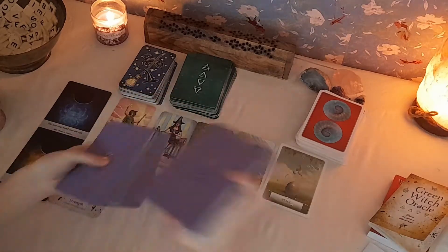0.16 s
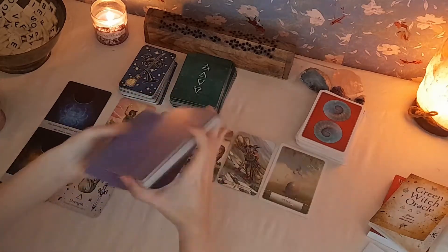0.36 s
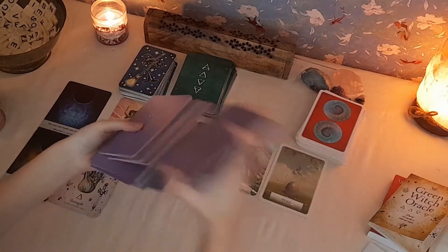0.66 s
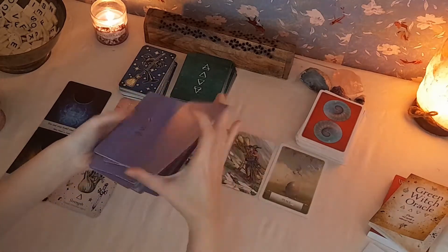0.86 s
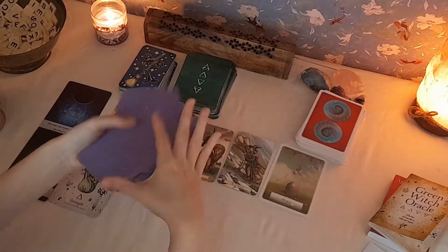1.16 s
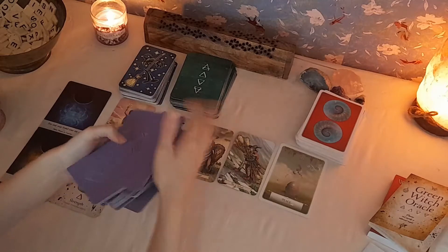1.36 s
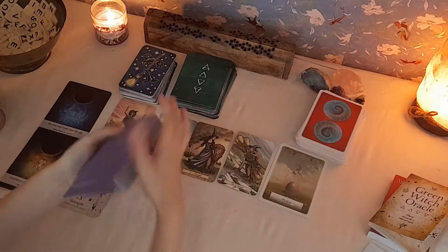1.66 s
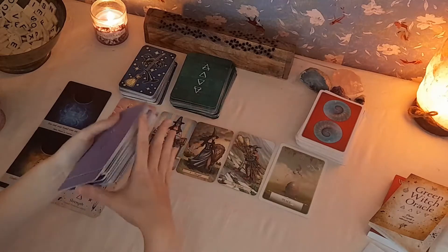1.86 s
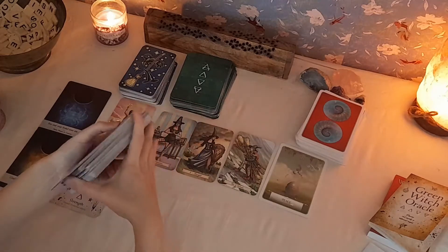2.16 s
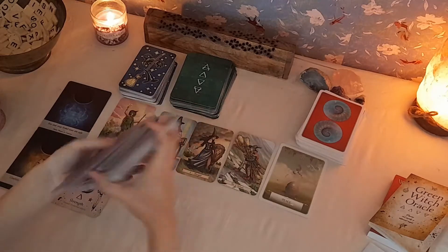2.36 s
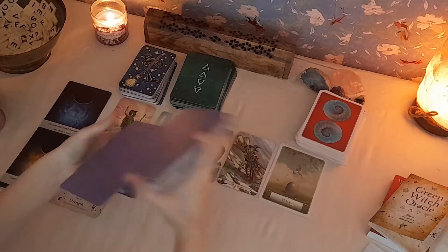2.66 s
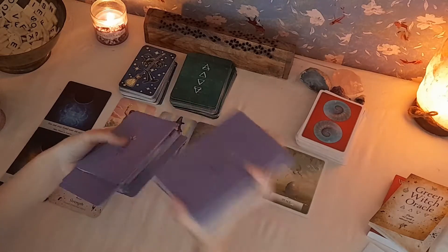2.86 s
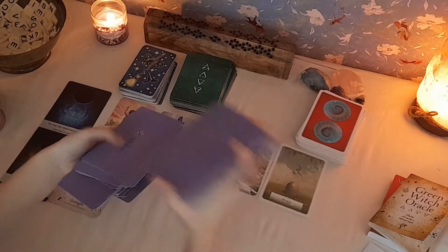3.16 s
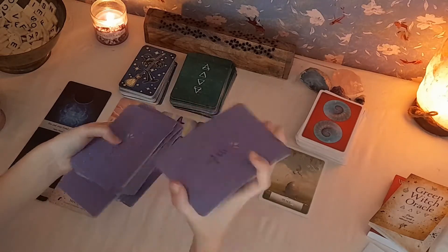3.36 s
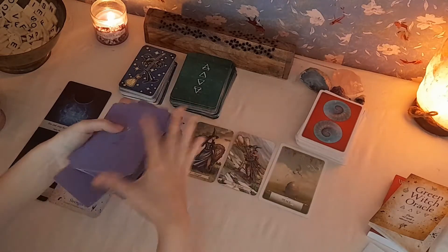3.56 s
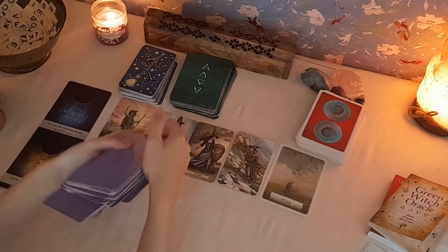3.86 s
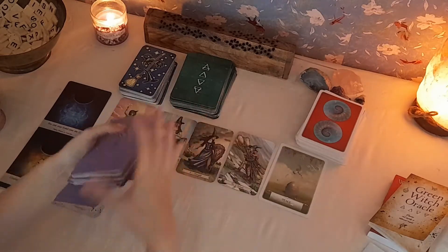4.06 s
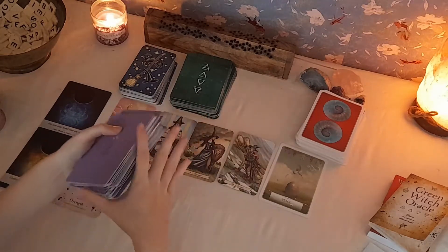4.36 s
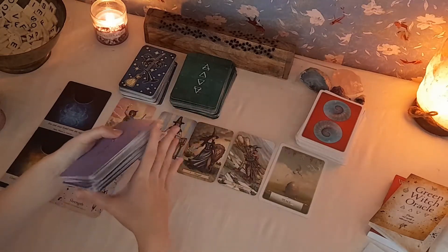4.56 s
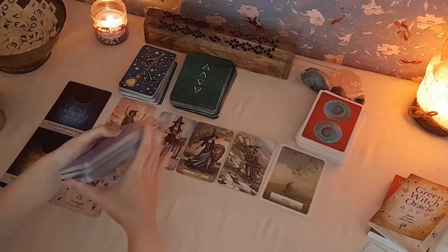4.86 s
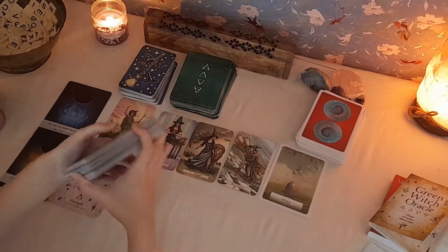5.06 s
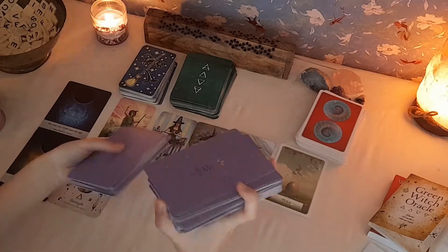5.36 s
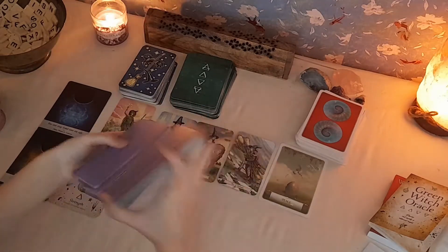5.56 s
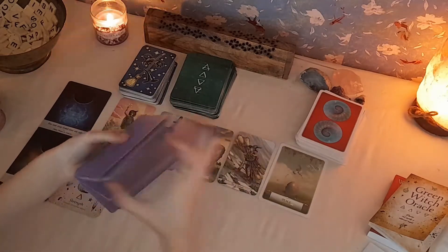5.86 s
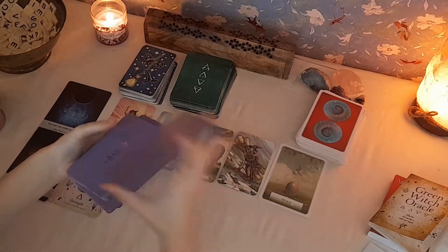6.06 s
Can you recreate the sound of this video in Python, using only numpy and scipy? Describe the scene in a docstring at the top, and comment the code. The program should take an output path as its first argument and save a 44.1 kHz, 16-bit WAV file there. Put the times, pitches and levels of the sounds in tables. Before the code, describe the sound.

A deck of large cards is shuffled by hand in runs of crisp slaps and slides, with soft rubs and ticks between.

```python
"""Overhand shuffle of large cards

A deck is shuffled above a cloth-covered table in a small room. Sliding friction gives each packet a
grainy hiss; its impact gives a slap, with a thump from the trapped air. Between runs the deck is
squared with soft rubs and ticks. The room rings briefly, over a mains hum and a faint rumble."""
import sys
import numpy as np
from scipy import signal
from scipy.fft import rfft, irfft, next_fast_len
from scipy.io import wavfile
from scipy.ndimage import uniform_filter1d

SR = 44100
rng = np.random.default_rng(int(sys.argv[2]) if len(sys.argv) > 2 else 0)


def unload_audio(sound):
    """Save the sound as a 16-bit wav file, at the path given as the first command line argument."""
    columns = np.transpose(np.atleast_2d(sound))
    # keep every value between -1 and 1, then stretch to whole-number steps
    steps = np.round(np.clip(columns, -1, 1) * 32767)
    wavfile.write(sys.argv[1], SR, steps.astype(np.int16))


N = 273861
T = np.arange(N) / SR

# noise spectrum of the quiet room: f/Hz, relative level/dB
AMBIENT_SPECTRUM = [(20, -1), (40, -2), (80, -27), (150, -15.5), (260, -13.5), (500, -21), (1000, -27),
                    (3000, -34.5), (8000, -33.5), (13000, -36), (16000, -37.5)]
# resonances of the table and the room's near corner: f/Hz, bandwidth/Hz, gain/dB
MODES = [(218, 43, -6.5), (351.8, 7.3, 7), (533, 71, 1), (732, 50, 1.5), (1103, 40, -0.5), (1295, 22, 3.5),
         (1600, 64, -6.5), (2340, 110, 0)]
# reverberation time of the room: f/Hz, T60/s
REVERB_TIMES = [(150, .28), (400, 0.4), (1100, 0.39), (2800, 0.29), (4800, 0.31), (8000, 0.23),
                (14000, 0.2)]
# frequency response of the reflections: f/Hz, gain/dB
WALL_RESPONSE = [(80, -6), (200, -6), (350, -4.5), (600, -4.5), (850, -6), (1200, -4), (1600, -3),
                 (2000, -2.5), (3000, -5), (5000, -6), (8000, -4), (15000, -6.5)]
# spectrum of card faces sliding: f/Hz, relative level/dB
HISS_SPECTRUM = [(400, -32), (900, -23.5), (2000, -12.5), (3500, -8), (5500, -6.5), (8500, -0.5),
                 (11000, -4), (13000, -11), (16000, -16)]
# spectrum of faces rasping under pressure: f/Hz, relative level/dB
RASP_SPECTRUM = [(80, -8), (160, 4.5), (500, -2), (1100, -4.5), (1700, -1.5), (2600, -4), (4000, -6),
                 (6000, -12.5), (9000, -26.5)]
# spectrum of edges scraping past each other: f/Hz, relative level/dB
SCRATCH_SPECTRUM = [(300, -16.5), (800, -5.5), (1600, -6), (2800, -2.5), (4500, -1), (7000, -6),
                    (12000, -27.5)]
# spectrum of one edge clicking into line: f/Hz, relative level/dB
TICK_SPECTRUM = [(300, -22), (1000, -7.5), (2400, 2), (4500, 1), (8500, 1.5), (13000, -8), (16000, -17)]
# finger strokes squaring the deck or drawing a packet: t/s, duration/s, hiss/dB, scratch/dB re hiss
FINGER_STROKES = [(-.01, 0.08, -70.5, -1), (.062, 0.12, -65, -12), (1.373, 0.048, -58.5, -8.5),
                  (1.431, 0.079, -67.5, 0), (1.598, 0.051, -76.5, 2), (1.85, 0.055, -82.5, 0.5),
                  (2.16, 0.33, -85.5, 4), (2.306, 0.13, -66, -11), (3.247, 0.053, -59.5, -12),
                  (3.752, 0.031, -62, -5.5), (3.79, .08, -69.5, -1), (3.91, 0.092, -76.5, -4.5),
                  (4.242, 0.062, -64.5, -14), (4.287, 0.058, -62, -22), (4.402, 0.064, -70, 2.5),
                  (4.934, .275, -76, -3), (5.2, .09, -65, -1.5)]
# single edges clicking into line: t/s, level/dB
EDGE_TICKS = [(1.86, -47.5), (1.988, -46), (2.375, -34), (3.923, -48), (3.999, -32.5), (4.235, -50),
              (4.422, -42), (5.04, -46.5), (5.214, -38.5)]
# packets sliding into the deck: t/s, duration/s, hiss/dB, rasp/dB re hiss
PACKET_SLIDES = [(0.151, .041, -51.5, -5), (0.409, 0.02, -53, 1), (0.438, 0.028, -47, 6.5),
                 (0.662, 0.031, -50.5, 0), (0.702, 0.032, -50.5, 3), (.909, 0.015, -46, 2),
                 (0.952, 0.046, -53, 8), (1.146, 0.069, -56.5, 0.5), (2.486, 0.01, -47.5, 1),
                 (2.766, 0.031, -48, -2), (3.012, 0.012, -55, 0), (3.029, 0.048, -48.5, 0.5),
                 (3.283, 0.057, -54.5, 3), (3.538, 0.07, -53.5, -4.5), (5.57, 0.022, -59.5, 9.5),
                 (5.585, 0.026, -49, 6.5), (5.618, 0.03, -50, -0.5), (5.874, 0.058, -47.5, -13),
                 (6.147, 0.05, -49, -2)]
# packets landing: t/s, slap/dB, slap f/Hz, snap/dB re slap, tick/dB re slap, clatter/dB re first contact
PACKET_LANDINGS = [(0.168, -15, 1300, -6.5, -2, -13), (0.44, -40.5, 1580, -14, 19.5, 16),
                   (0.466, -21, 1640, -2, 1, 4.5), (0.665, -22, 570, -11, -25, -33),
                   (0.742, -22.5, 1060, -5.5, -9.5, 2.5), (0.911, -21.5, 2030, -4.5, -9, 6),
                   (0.95, -16, 1900, -7, -7, 0), (0.98, -16, 1070, 1, -13, -7),
                   (1.146, -44, 1490, 13.5, 7, -4), (1.159, -26, 1720, 2.5, 2.5, -3.5),
                   (2.492, -22.5, 1370, -6, -3.5, -8), (2.745, -38, 2220, 4, 5, -7.5),
                   (2.768, -28, 1610, -7, -7, -14), (2.81, -17, 1420, -3.5, -5, -19),
                   (3.086, -4, 1305, -1, -13.5, -7.5), (3.356, -7, 1070, -6, -14, -11),
                   (3.523, -10.5, 1300, -3, -2, -3.5), (3.568, -28.5, 1220, 6, 5, 0),
                   (5.3, -30, 1870, 1.5, 6.5, -0.5), (5.651, -23, 1510, -1.5, -1, -17),
                   (5.88, -9, 1850, 0.5, -5.5, 4.5), (5.946, -24, 1080, -1.5, -6, 0),
                   (6.149, -20.5, 890, -2.5, -4.5, -3.5)]


def undb(db):
    """Amplitude ratio of a level in decibels."""
    return 10 ** (np.asarray(db) / 20)


def level(x, db):
    """Scaling to a given rms level."""
    return x * undb(db) / np.sqrt(np.mean(x ** 2))


def unit(x):
    """Normalisation to unit energy."""
    return x / np.sqrt(np.sum(x ** 2))


def lookup(points, hz):
    """Interpolation on a logarithmic frequency axis."""
    f, value = np.transpose(points)
    return np.interp(np.log(np.maximum(hz, 1)), np.log(f), value)


def colour(x, points):
    """Spectral shaping by a curve of f/Hz, gain/dB."""
    size = next_fast_len(2 * len(x))
    gain = undb(lookup(points, np.fft.rfftfreq(size, 1 / SR)))
    return irfft(rfft(x, size) * gain, size)[:len(x)]


def whiten(x):
    """Whitening: a flat magnitude spectrum, with the phase that holds the burst's timing."""
    spectrum = rfft(x)
    return unit(irfft(spectrum / (np.abs(spectrum) + 1e-12), len(x)))


def band(x, lo_hz, hi_hz, order=2):
    """Causal Butterworth band-pass."""
    return signal.sosfilt(signal.butter(order, [lo_hz, hi_hz], "band", fs=SR, output="sos"), x)


def resonate(x, hz, width_hz):
    """Damped resonator with unit gain at its centre."""
    return signal.lfilter(*signal.iirpeak(hz, hz / width_hz, fs=SR), x)


def drift(rate_hz):
    """Smooth random modulation with a spread near one."""
    step = max(int(SR / rate_hz), 2)
    return uniform_filter1d(np.repeat(rng.standard_normal(N // step + 1), step), step)[:N]


def contacts(size, per_s, spread_db):
    """Shot noise: tiny contacts of uneven strength at random moments."""
    chance, strength, sign = rng.random(size), rng.standard_normal(size), rng.choice([-1, 1], size)
    return (chance < per_s / SR) * sign * undb(spread_db * np.clip(strength, -2, 2))


def background(mains_hum_hz=119.9):
    """Superposition of a slightly wavering mains hum, a low rumble and broadband noise."""
    phase = 2 * np.pi * mains_hum_hz * T + 0.038 * drift(3)
    hum = level(np.sin(phase) * undb(0.6 * drift(4.9)), -68.5)
    rumble = level(band(rng.standard_normal(N), 38, 85), -74.5)
    ambient = level(colour(rng.standard_normal(N), AMBIENT_SPECTRUM), -73.5)
    return hum + rumble + ambient


def reflections():
    """Impulse response: early echoes from the near wall and a diffuse tail whose treble dies first."""
    t = np.arange(SR // 2) / SR
    spectrum, f = rfft(rng.standard_normal(len(t))), np.fft.rfftfreq(len(t), 1 / SR)
    edges_hz = np.geomspace(60, 17000, 25)
    tail = 0
    for lo, hi in zip(edges_hz, edges_hz[1:]):
        noise = irfft(spectrum * (f >= lo) * (f < hi), len(t))
        tail += noise * undb(-60 * t / lookup(REVERB_TIMES, np.sqrt(lo * hi)))
    early = unit(rng.standard_normal(len(t)) * (t > 0.008) * np.exp(-t / 0.0046))
    return colour(undb(-1) * unit(tail * (t > 0.002)) + undb(-3) * early, WALL_RESPONSE)


def room(direct):
    """Resonance and reverberation: the modes stay fixed; echo paths vary as hands and cards move."""
    shares = np.array([drift(60) for _ in range(4)])
    shares /= np.sqrt(np.sum(shares ** 2, axis=0))  # constant total power
    echoes = sum(signal.fftconvolve(direct * share, reflections())[:N] for share in shares)
    ringing = sum(undb(db) * resonate(direct, hz, width) for hz, width, db in MODES)
    return direct + ringing + echoes


def draught(sliding, swell_s=0.035, grip_at_s=4.325):
    """Air displacement: each sliding packet pushes a little air, as does the hand gripping the deck."""
    swell = undb(-6) * uniform_filter1d(sliding, int(swell_s * SR))
    grip = undb(-62) * np.exp(-((T - grip_at_s) / 0.06) ** 2)
    packet_air = swell * level(band(rng.standard_normal(N), 42, 110), 0)
    hand_air = grip * level(band(rng.standard_normal(N), 36, 65), 0)
    return packet_air + hand_air


def friction(spectrum, per_s, spread_db):
    """Friction noise: paper fibres catch densely under a grip that comes and goes."""
    catches = level(contacts(N, per_s, spread_db), 0) + 0.75 * rng.standard_normal(N)
    grip = undb(3.5 * np.tanh(drift(140)))
    return level(colour(catches, spectrum) * grip, 0)


def rubs(attack_s=0.018, release_s=0.025):
    """Light friction: fingertips smooth the deck with a hiss, scratchier where edges slip."""
    hiss_gain, scratch_gain = np.zeros(N), np.zeros(N)
    for onset, duration, hiss_db, scratch_db in FINGER_STROKES:
        rise = np.clip((T - onset) / attack_s, 0, 1)
        fall = np.clip(1 - (T - onset - duration) / release_s, 0, 1)
        stroke = undb(hiss_db) * rise * fall
        hiss_gain += stroke
        scratch_gain += undb(scratch_db) * stroke
    hiss = hiss_gain * friction(HISS_SPECTRUM, per_s=4000, spread_db=3.45)
    scratch = scratch_gain * friction(SCRATCH_SPECTRUM, per_s=700, spread_db=5.5)
    return hiss + scratch


def ticks(decay_s=0.003):
    """Light impact: a stray card's edge clicks into line, with no air or weight behind it."""
    out = np.zeros(N + SR)
    t = np.arange(SR // 10) / SR
    for onset, db in EDGE_TICKS:
        burst = colour(rng.standard_normal(len(t)) * np.exp(-t / decay_s), TICK_SPECTRUM)
        start = int(onset * SR)
        out[start:start + len(t)] += undb(db) * unit(burst)
    return out[:N]


def slide_envelopes(whisper_s=0.066, whisper_db=-17):
    """Amplitude envelopes of friction: a packet whispers, bites at once, eases as it slows, and stops."""
    hiss_gain, rasp_gain = np.zeros(N), np.zeros(N)
    for onset, duration, hiss_db, rasp_db in PACKET_SLIDES:
        corners_s = onset + np.array([0, 0.00067, 0.0014 + 0.87 * duration, 0.002 + duration])
        contact = np.interp(T, corners_s, [0.001, 0.7, 0.6, 0.00036])
        whisper = np.interp(T, [onset - whisper_s, onset, onset + 0.0071], [0, 1, 0]) ** 2
        hiss_gain += undb(hiss_db) * (contact + undb(whisper_db) * whisper)
        rasp_gain += undb(hiss_db + rasp_db) * contact
    return hiss_gain, rasp_gain


def slides(hiss_gain, rasp_gain):
    """Sliding friction: card faces hiss as they move and rasp when pressed into the deck."""
    hiss = hiss_gain * friction(HISS_SPECTRUM, per_s=3500, spread_db=7)
    rasp = rasp_gain * friction(RASP_SPECTRUM, per_s=3700, spread_db=8)
    return hiss + rasp


def landings(face_s=0.0003, edge_s=0.00092, clatter_s=0.013):
    """Impact excitation: trapped air thumps, the stack slaps, the card snaps and its edge ticks."""
    out = np.zeros(N + SR)
    t = np.arange(-SR // 100, SR // 10) / SR
    fade = lambda decay_s: (t >= 0) * np.exp(-np.abs(t) / decay_s)
    for onset, slap_db, slap_hz, snap_db, tick_db, clatter_db in PACKET_LANDINGS:
        loose_cards = contacts(len(t), per_s=9100, spread_db=-0.5)
        clatter = undb(clatter_db) * unit(loose_cards * fade(clatter_s))
        # the face meets the deck almost at once; the edge touches down bit by bit
        face_force = whiten(rng.standard_normal(len(t)) * fade(face_s)) + clatter
        edge_force = whiten(rng.standard_normal(len(t)) * fade(edge_s)) + clatter
        thump_db = -16.5 + 0.45 * slap_db  # grows more slowly than the slap
        thump = undb(thump_db) * unit(band(face_force, 100, 600))
        slap = unit(resonate(band(face_force, 350, 2100), slap_hz, width_hz=550))
        snap = undb(snap_db) * unit(resonate(band(edge_force, 2100, 4650), 2500, width_hz=1700))
        tick = undb(tick_db) * unit(band(band(edge_force, 6100, 14000), 3000, 6500, order=1))
        start = int((onset + 0.001 + t[0]) * SR)
        out[start:start + len(t)] += undb(slap_db) * (slap + snap + tick) - thump
    return out[:N]


def scene():
    """Superposition of the cards in the room, the air they move and the background, in one channel."""
    hiss_gain, rasp_gain = slide_envelopes()
    cards = landings() + slides(hiss_gain, rasp_gain) + rubs() + ticks()
    return (room(cards) + draught(hiss_gain) + background())[None]


def record(dry):
    """Band limiting: a steep elliptic low-pass removes the treble above 15.9 kHz."""
    return signal.sosfilt(signal.ellip(10, 0.2, 70, 15900, fs=SR, output="sos"), dry)


dry = scene()
out = record(dry)
unload_audio(out)
```